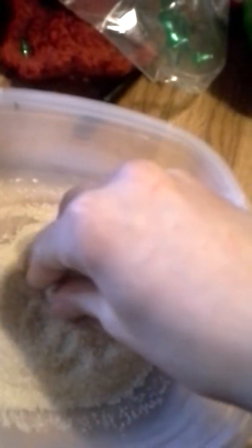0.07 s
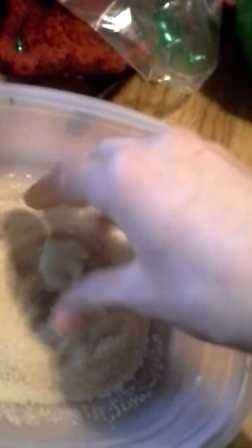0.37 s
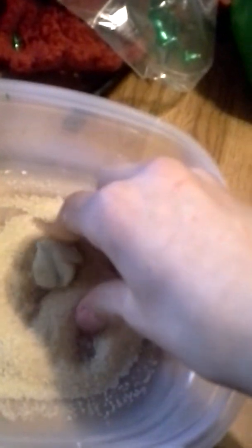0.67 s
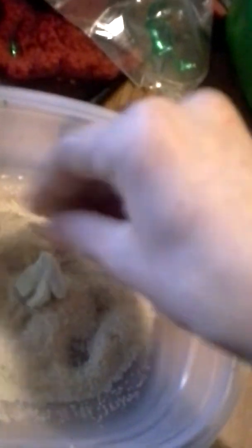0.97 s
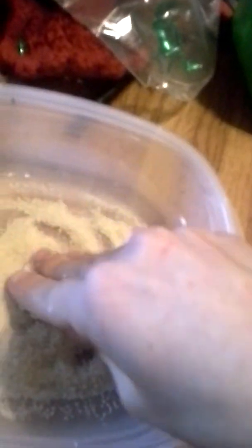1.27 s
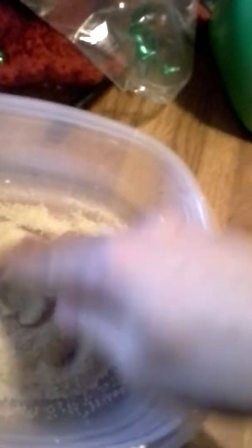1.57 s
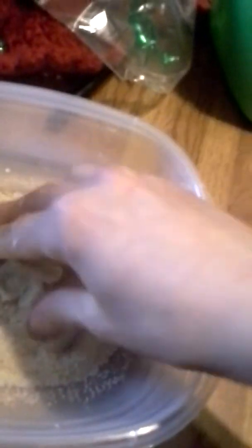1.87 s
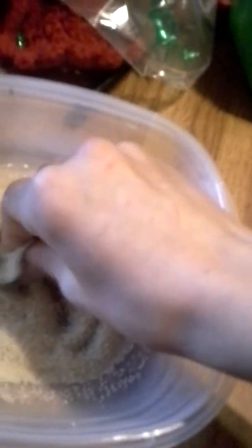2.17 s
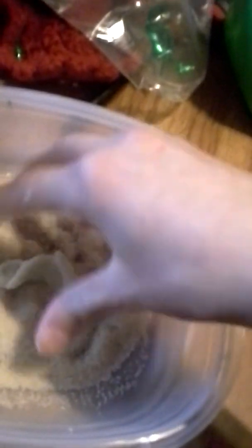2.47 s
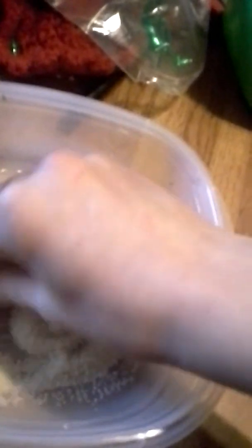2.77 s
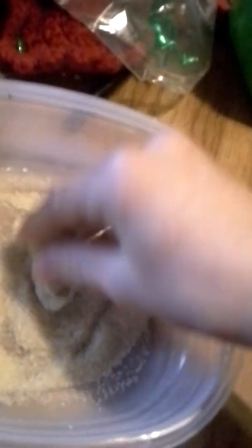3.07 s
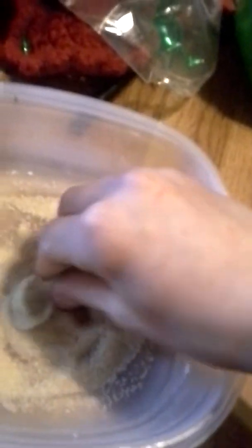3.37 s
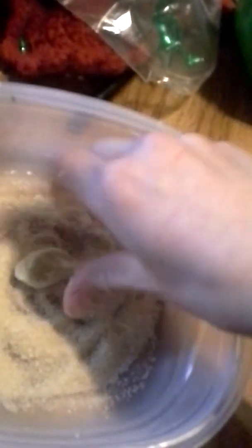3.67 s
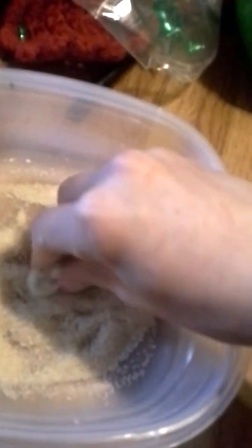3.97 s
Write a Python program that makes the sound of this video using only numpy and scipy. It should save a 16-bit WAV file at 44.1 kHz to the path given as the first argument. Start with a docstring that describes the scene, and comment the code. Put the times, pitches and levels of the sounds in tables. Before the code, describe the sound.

A hand scoops and presses gritty sand in a plastic tub, hissing and crunching.

```python
"""A quiet room, one microphone close to a plastic tub: a bare hand scoops, squeezes and pats gritty sand.
From the first stroke, thousands of slipping grains hiss, rasp and, under pressure, ring the tub. At 0.5 s
the hand digs harder: coarse grains snap, fingertips bump the plastic, and the tub thuds on the table.
Lighter strokes follow, loose sand trickling between them, and near 2 s packed grains begin to squeak.
After a lull comes a firm squeeze at 2.7 s, then a run of strokes to the end at 4 s."""
import sys
import numpy as np
from scipy import signal
from scipy.fft import rfft, irfft
from scipy.io import wavfile

SR = 44100
rng = np.random.default_rng(int(sys.argv[2]) if len(sys.argv) > 2 else 0)


def output_pcm(signal):
    """Save a mono or channel-first signal as 16-bit PCM at the path in sys.argv[1].

    Samples are clipped to [-1, 1] before scaling.
    """
    pcm = np.clip(np.atleast_2d(signal).T, -1, 1) * 32767
    wavfile.write(sys.argv[1], SR, np.round(pcm).astype(np.int16))


N = 4 * SR

# Finger strokes: t/s, attack/s, hold/s, release/s, level/dB, change over the hold/dB, tub pressure/dB,
# rasp/dB, dust/dB, hiss centre f/Hz, favoured resonance f/Hz, its level/dB
STROKES = [ (0.015, 0.015, 0.18, 0.12, -32.5, 0, -11, -11.5, -4, 6460, 4580, -12),
           (0.255, 0.013, 0.036, 0.088, -39, -1.5, -8.5, -19, 3, 6650, 3780, -8),
           (0.415, 0.037, 0.0045, 0.014, -36.5, -4.5, -18, -30, -5, 7000, 7400, -12),
           (0.501, 0.0065, 0.0051, 0.024, -30.5, 2.5, -10, -2, -3, 6600, 1920, -7),
           (0.523, 0.044, 0.034, 0.027, -25, -1.5, -10.5, -6, -3.5, 6470, 1840, -7),
           (0.603, 0.048, 0.022, 0.11, -26, 3, -10.5, -11, -3.5, 6500, 850, -23.5),
           (0.725, 0.039, 0.024, 0.099, -28, 0, -15, -10.5, -4, 5940, 5900, -7),
           (0.817, 0.024, 0.032, 0.047, -33, 2.5, -10.5, -11, -6, 6200, 5850, -19),
           (0.997, 0.046, 0.053, .02, -43.5, 6, -18, -19, -16, 6130, 5970, -8),
           (1.124, 0.0067, 0.094, 0.043, -44.5, 7.5, -12, -10, 0.5, 6900, 6950, -0.5),
           (1.194, 0.021, 0.0069, 0.041, -29.5, 2, -17, -14, -9, 6300, 1500, -16),
           (1.232, 0.012, 0.15, 0.11, -34, -3, -17, -12.5, -6.5, 6000, 1180, -13),
           (1.39, 0.072, 0.027, 0.19, -40.5, 2, -18, -7.5, -6, 6200, 1080, -17),
           (1.556, 0.044, 0.013, 0.059, -35.5, -3, -13, -12.5, -1.5, 6300, 1140, -13.5),
           (1.867, 0.0095, 0.019, 0.017, -31, 0.5, -12, 0, -2, 5500, 2700, -5),
           (1.898, 0.035, 0.075, 0.065, -29.5, 3.5, -16, -8.5, -4.5, 6660, 1080, -13.5),
           (2.023, 0.014, 0.3, 0.04, -32, 3, -19, -9.5, -6.5, 6570, 1150, -17.5),
           (2.401, .005, 0.0045, 0.0099, -33.5, 1, -24, -17, -7, 6640, 5000, -20),
           (2.417, .008, 0.026, 0.032, -43, 7, -25, -20, -3, 6500, 5050, -10),
           (2.609, 0.006, 0.021, 0.057, -39, -2, -10, -4.5, -3, 7100, 6450, -5),
           (2.647, 0.012, 0.0069, 0.019, -24, 3, -6, -10, -7, 6200, 4540, -11),
           (2.664, 0.012, 0.056, 0.057, -24.5, 1, -11, -7.5, -4.5, 6600, 4930, -12),
           (2.731, 0.033, 0.086, 0.076, -26.5, -6, -9, -8, -3, 7060, 4340, -9),
           (3.041, 0.013, 0.011, 0.013, -35, 7, -19, -16, -7, 6600, 2820, -17),
           (3.08, 0.018, 0.046, 0.058, -32.5, 3, -12, -12.5, -3.5, 6200, 6640, -18),
           (3.217, 0.036, 0.047, 0.068, -33.5, 1.5, -9, -7, -6.5, 6200, 4450, -10.5),
           (3.313, 0.031, 0.18, 0.062, -30.5, -1, -12, -10, -7.5, 6660, 4350, -14),
           (3.535, 0.027, 0.086, 0.055, -33.5, 4, -15, -12, -5.5, 6860, 6600, -4),
           (3.744, 0.012, .012, 0.24, -32, -2.5, -16, -28, -11, 6100, 2700, -17),
           (3.806, 0.0081, 0.0095, 0.016, -31.5, 1, -4, -3.5, -2, 6050, 1800, -10),
           (3.821, 0.015, 0.11, 0.012, -35, 7, -13, -10, -3, 6300, 1580, -15),
           (3.942, 0.026, .03, .04, -32.5, 5, -10.5, -14, -6.5, 6660, 1170, -13.5), ]
# Coarse grains snapping: t/s, level/dB, then relative to that level: tub ring/dB, rasp/dB, dust/dB
SNAPS = [(0.017, -28.5, -16, -20, 6), (.109, -24, -25, -26, -18), (.271, -35.5, -10, 8, -8),
         (0.365, -30.5, -9, -14, -10), (0.5254, -13, -8, -14, -8), (.5885, -19, -20, -20, -10),
         (0.7285, -22, -15, -24, -5), (.768, -21, -20, -22, -10), (.8093, -22.5, -18, -11, -10),
         (.859, -17, -22, -18, -12), (1.029, -30, -23, -18, -14), (1.064, -26.5, -20, -24, -17),
         (1.0965, -30.5, -15, 3.5, -12), (1.102, -25, -12, -21, -14), (1.107, -27, -21, -12, -10),
         (1.137, -28, -24, -20, -10), (1.144, -28, -24, -22, -10), (1.162, -33, -14, 2, -5),
         (1.2224, -27, -21, -18, -16), (1.2222, -18, -20, -22, -16), (1.2511, -10, -35, -22, -22),
         (1.762, -31.5, -20, -19, -16), (2.1825, -17.5, -18, -18, -12), (2.3093, -23.5, -15, -15, -12),
         (2.406, -36, -22, -18, -8), (2.482, -29.5, -19, -4.5, -4), (2.5571, -34, -14, 0, 8),
         (2.598, -37, -11, 1, 3), (2.627, -28, -8, -21, -8), (2.636, -28.5, -3.5, -12, -8),
         (3.145, -27, -22, -20, -14), (3.230, -34, -4, 9, -10), (3.279, -22, -22, -16, -12),
         (3.323, -32, 4.5, 9.5, -10), (3.371, -32.5, 1, 9, -10), (3.5855, -26, -20, -18, -8),
         (3.813, -22, -3, -12, 2), (3.825, -22, -6, -15, -8), (3.855, -26, -1.5, -16, -12)]
# Fingertips bumping the tub: t/s, level/dB, f/Hz
BUMPS = [(0.063, -28.5, 1070), (0.567, -19.5, 1830), (.693, -28, 950), (1.215, -27.5, 1280),
         (1.2235, -27, 1280), (1.2516, -23, 1340), (1.928, -24.5, 1180), (2.021, -31, 1064),
         (2.662, -29, 1100), (2.667, -21.5, 1740), (2.855, -31, 1090)]
# Packed grains squeaking: t/s, length/s, f/Hz, level/dB
SQUEAKS = [(1.944, .016, 6650, -26), (1.972, 0.028, 6630, -30), (2.009, .012, 6750, -28),
           (2.682, 0.0094, 6850, -21), (2.695, 0.023, 6850, -21.5), (3.048, .025, 6700, -33),
           (3.135, 0.071, 6560, -36), (3.924, 0.018, 6900, -23.5), (3.978, 0.026, 6780, -34)]
# Flow of loose sand: t/s, level/dB
TRICKLE_FLOW = [(0, -53.5), (.4, -49.5), (.49, -51.5), (.92, -46), (1.1, -44), (1.6, -51.5), (1.722, -52),
                (1.85, -60.5), (2.4, -42.5), (2.56, -55.5), (2.9, -48.5), (3.2, -43), (3.72, -47.5),
                (4, -43)]
# Modes of the plastic tub: f/Hz, width/Hz, level/dB
TUB_MODES = [(655, 490, -16), (1074, 205, 4.5), (1312, 213, -4.5), (1560, 83, 0), (1880, 220, -1),
             (2773, 113, -6.5)]
# Spectrum of slipping sand, a bright hiss: f/Hz, level/dB
HISS_SPECTRUM = [(100, -30.5), (500, -17), (2300, -22.5), (3500, -10.5), (4050, -9.5), (4400, -2),
                 (4700, -2), (5050, -1), (5850, 2), (6250, -1), (6750, 4), (7400, 1), (8500, -7.5),
                 (8900, -5.5), (10000, -10.5), (18000, -12.5)]
# Spectrum of scraping grains, a midrange rasp: f/Hz, level/dB
RASP_SPECTRUM = [(100, -28), (700, -13.5), (1500, -5), (2300, -12), (2750, -2.5), (3100, -5.5),
                 (3700, -1.5), (4400, 1), (5500, -5.5), (18000, -70)]
# Spectrum of fine dust, a high sizzle: f/Hz, level/dB
DUST_SPECTRUM = [(100, -53), (3000, -4), (7000, -5.5), (9000, 2.5), (10200, -2), (11500, 2.5), (13000, 2.5),
                 (14500, 7.5), (18000, 0)]
# Spectrum of the room's hush: f/Hz, level/dB
ROOM_SPECTRUM = [(25, -37), (50, -3), (80, -4), (130, -0.5), (250, 0.5), (500, -0.5), (1100, -1),
                 (2000, -5), (3000, -11.5), (7000, -25.5), (11000, -16), (17000, -17.5)]

GRAINS_PER_S, CRUNCH_PER_S, GRIT_PER_S, TRICKLE_PER_S = 16000, 3000, 200, 5600
JERK_PER_S, JERK_DB = 90, 0.72  # the sand gives way in small jerks
PATCH_JERK_PER_S, PATCH_JERK_DB = 58, 1.48  # each patch of grains also slips by itself
HISS_DB, HISS_PEAK_DB, GRIT_DB = -2, -5, -6
THUD_S, THUD_HZ, THUD_DECAY_S, THUD_DB = 0.766, 134, 0.0073, -39.5


def strokes():
    """Fingers push through the sand: grains hiss and rasp, dust sizzles, pressed grains ring the tub."""
    jerk = undb(JERK_DB * walk(JERK_PER_S)) * clumps()
    slip, slide, scrape, dust, rub = (slipping_patch(jerk) for _ in range(5))
    rub = rub * flare()
    scrape = scrape + undb(GRIT_DB) * grains(GRIT_PER_S, spread_db=1.5)  # coarse grit on the plastic
    power, resonances = np.zeros((4, N)), np.zeros(N)
    for (start, attack, hold, release, db, change_db, press_db, rasp_db, dust_db,
         hiss_hz, mode_hz, mode_db) in STROKES:
        end = start + attack + hold + 2 * np.e * release
        at = np.arange(int(start * SR), min(int(end * SR), N))
        t = at / SR - start
        held_db = db + change_db * np.clip((t - attack) / hold, 0, 1)
        fade = np.exp(-2 * np.maximum(t - attack - hold, 0) / release)
        effort = np.clip(t / attack, 0, 1) * undb(held_db) * fade
        power[:, at] += np.outer(undb([0, press_db, rasp_db, dust_db]), effort) ** 2
        resonances[at] += undb(HISS_PEAK_DB) * resonate(slide[at] * effort, hiss_hz, width_hz=1500)
        resonances[at] += undb(mode_db) * resonate(rub[at] * effort, mode_hz, width_hz=470)
    flow, pressure, rasp_gain, dust_gain = np.sqrt(power)  # overlapping strokes add in power
    hiss = undb(HISS_DB) * colour(slip * flow, HISS_SPECTRUM)
    rasp = colour(scrape * rasp_gain, RASP_SPECTRUM)
    sizzle = colour(dust * dust_gain, DUST_SPECTRUM)
    return hiss + resonances + pressed_tub(pressure * jerk) + rasp + sizzle


def slipping_patch(jerk):
    """A patch of colliding grains follows the shared jerks and adds its own."""
    return grains(GRAINS_PER_S, spread_db=3) * jerk * undb(PATCH_JERK_DB * walk(PATCH_JERK_PER_S))


def clumps(per_s=110, decay_s=0.0011, power_share=0.13):
    """Gain of the flow as clumps collapse, each a sudden surge of limited size that dies away; rms 1."""
    collapses = np.abs(grains(per_s, spread_db=3))
    surge = signal.lfilter([1], [1, -np.exp(-1 / (decay_s * SR))], collapses)
    limited = unit(np.tanh(unit(surge) / 2))
    return np.sqrt(1 - power_share + power_share * limited ** 2)


def flare(per_s=45, depth_db=3):
    """Gain of a resonance that flares and fades within bounds as the contact shifts; rms 1."""
    return unit(undb(depth_db * 2 * np.tanh(walk(per_s) / 2)))


def pressed_tub(pressure):
    """Pressed grains drive the tub; each mode flares by itself as the fingers shift."""
    crunch = grains(CRUNCH_PER_S, spread_db=2) * pressure
    weights = np.array([undb(db) * np.sqrt(width) for _, width, db in TUB_MODES])
    weights /= np.linalg.norm(weights)
    return sum((-1) ** k * weights[k] * ring(crunch * flare(), [mode])
               for k, mode in enumerate(TUB_MODES))


def snaps(tick_db=-2, note_db=-0.5):
    """Coarse grains give way with a tick and a short note; those against the plastic rasp and ring it."""
    forces, notes = np.zeros((4, N)), np.zeros(N)
    for start, db, tub_db, rasp_db, dust_db in SNAPS:
        force = undb(db) * contact(start, decay_s=0.0011)
        forces += np.outer(undb([0, tub_db, rasp_db, dust_db]), force)
        notes += undb(db + note_db) * ping(start, hz=6080, rise_s=0.00055)
    tick, tub, rasp, dust = forces
    return (undb(tick_db) * colour(tick, HISS_SPECTRUM) + notes + ring(tub, TUB_MODES)
            + colour(rasp, RASP_SPECTRUM) + colour(dust, DUST_SPECTRUM))


def bumps(grit_db=-1.5, knock_db=-1):
    """Fingertips knock the sand-damped plastic, its hollow note set by where they land."""
    force, knocks = np.zeros((2, N))
    for start, db, hz in BUMPS:
        force += undb(db + grit_db) * contact(start, decay_s=0.002)
        knocks += undb(db + knock_db) * ping(start, hz, rise_s=0.0009)
    return knocks + ring(force, TUB_MODES)


def squeaks(waver_depth=0.022, waver_per_s=360):
    """Packed grains briefly slip in step and sing on a wavering note."""
    t = np.arange(N) / SR
    waver = 1 + waver_depth * walk(waver_per_s)
    out = np.zeros(N)
    for start, length, hz, db in SQUEAKS:
        at = (t > start) & (t < start + length)
        swell = np.sin(np.pi * (t[at] - start) / length)
        phase = 2 * np.pi * hz * np.cumsum(waver[at]) / SR
        out[at] += undb(db) * swell * np.sin(phase)
    return out * flare()


def table_thud():
    """The tub nudges the table once: a low, quickly damped note."""
    since = np.maximum(np.arange(N) / SR - THUD_S, 0)
    return undb(THUD_DB) * np.sin(2 * np.pi * THUD_HZ * since) * np.exp(-since / THUD_DECAY_S)


def trickle(dust_db=-5):
    """Loose grains fall from the fingers and settle."""
    flow_db = np.interp(np.arange(N) / SR, *np.array(TRICKLE_FLOW).T)
    fall = grains(TRICKLE_PER_S, spread_db=3.5) * undb(flow_db)
    return colour(fall, HISS_SPECTRUM) + undb(dust_db) * colour(fall, DUST_SPECTRUM)


def wall_echo(direct, delay_s=0.003, t60_s=0.083, level_db=-13):
    """The walls return a short, diffuse tail, faint this close to the tub."""
    t = np.arange(SR // 2) / SR
    tail = rng.standard_normal(len(t)) * np.exp(-np.log(1000) * t / t60_s) * (t > delay_s)
    return undb(level_db) * convolve(direct, tail)


def room_tone(level_db=-49.5):
    """The steady, dull hush of the room behind the sand."""
    return undb(level_db) * colour(rng.standard_normal(N), ROOM_SPECTRUM)


def undb(db):
    """Decibels to gain."""
    return 10 ** (np.asarray(db) / 20)


def unit(x):
    """Scale to rms 1."""
    return x / np.sqrt(np.mean(x ** 2) + 1e-18)


def walk(per_s):
    """A random line through per_s points a second, its spread near 1."""
    return np.interp(np.arange(N) * per_s / SR, np.arange(N), rng.standard_normal(N))


def grains(per_s, spread_db):
    """Random collisions, most small and a few large; rms 1."""
    hits = rng.random(N) < per_s / SR
    signs = rng.choice([-1, 1], N)
    sizes = undb(spread_db * np.minimum(rng.exponential(size=N), 6))
    return unit(hits * signs * sizes)


def place(sound, start):
    """Set a short sound into silence, start seconds in."""
    return np.pad(sound, (int(start * SR), N))[:N]


def contact(start, decay_s):
    """A brief, gritty burst of force."""
    t = np.arange(SR // 20) / SR
    return place(rng.choice([-1, 1], len(t)) * np.exp(-t / decay_s), start)


def ping(start, hz, rise_s):
    """A heavily damped note whose envelope peaks at 1 after the rise time."""
    t = np.arange(SR // 20) / SR
    return place(t / rise_s * np.exp(1 - t / rise_s) * np.sin(2 * np.pi * hz * t), start)


def convolve(x, response):
    """Apply an impulse response, scaled so that white noise keeps its power."""
    return signal.oaconvolve(x, response / np.linalg.norm(response))[:len(x)]


def colour(x, spectrum):
    """Minimum-phase filter shaped by (f/Hz, level/dB) points; white noise keeps its power."""
    size = 4096
    hz, db = np.array(spectrum, float).T
    log_hz = np.log(np.fft.rfftfreq(size, 1 / SR) + 1)
    gain = undb(np.interp(log_hz, np.log(hz), db))
    cepstrum = irfft(np.log(gain))
    cepstrum[1:size // 2] *= 2  # fold onto positive time, so nothing sounds ahead of a hit
    cepstrum[size // 2 + 1:] = 0
    return convolve(x, irfft(np.exp(rfft(cepstrum))))


def ring(x, modes):
    """Drive damped modes (f/Hz, width/Hz, level/dB) of alternating sign; white noise keeps its power."""
    t = np.arange(SR // 20) / SR
    response = np.zeros(len(t))
    for k, (hz, width, db) in enumerate(modes):
        envelope = undb(db) * width * np.exp(-np.pi * width * t)
        response += (-1) ** k * envelope * np.cos(2 * np.pi * hz * t)
    return convolve(x, response)


def resonate(x, hz, width_hz):
    """A steep-sided resonance from two passes of a peak filter; white noise keeps its power."""
    b, a = signal.iirpeak(hz, hz / width_hz, fs=SR)
    return signal.lfilter(b, a, signal.lfilter(b, a, x)) * np.sqrt(2 * SR / np.pi / width_hz)


def scene():
    """At the microphone, in mono: the sand close by, the walls farther off, the room's hush behind."""
    sand = strokes() + squeaks() + snaps() + bumps() + table_thud() + trickle()
    return (sand + wall_echo(sand) + room_tone())[None]


def record(dry):
    """The recorder cuts the deep bass gently and the top steeply."""
    low_cut_hz, top_hz = 95, 17600
    low_cut = signal.butter(2, low_cut_hz, "high", fs=SR, output="sos")
    top_cut = signal.ellip(10, 0.2, 70, top_hz, fs=SR, output="sos")
    return signal.sosfilt(top_cut, signal.sosfilt(low_cut, dry))


dry = scene()
out = record(dry)
output_pcm(out)
```